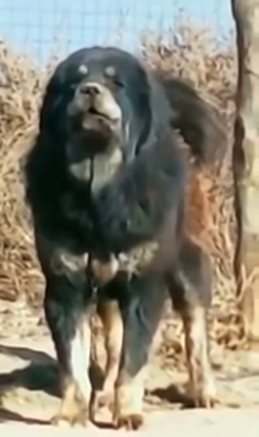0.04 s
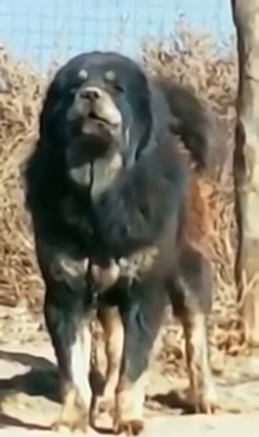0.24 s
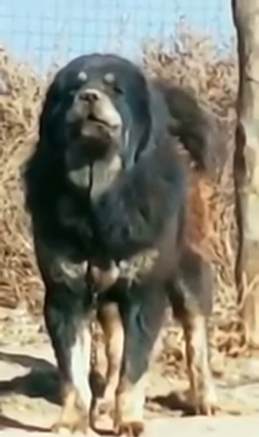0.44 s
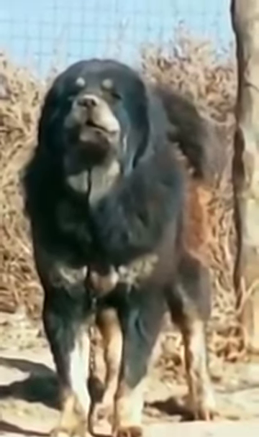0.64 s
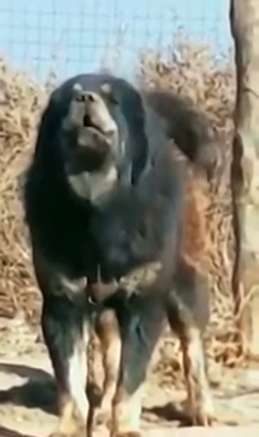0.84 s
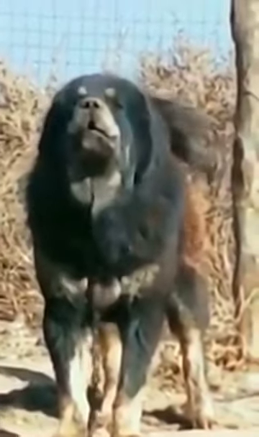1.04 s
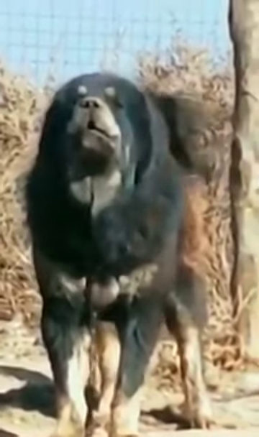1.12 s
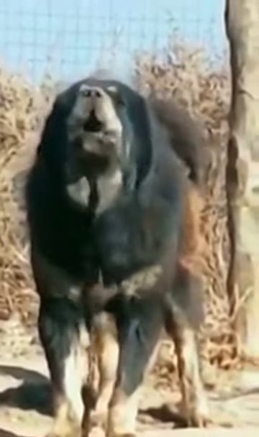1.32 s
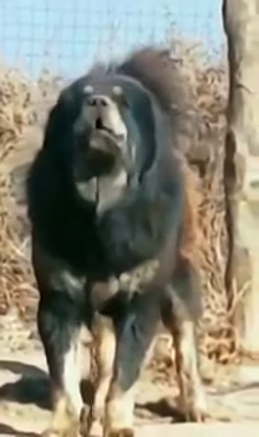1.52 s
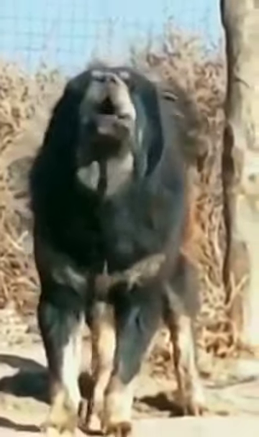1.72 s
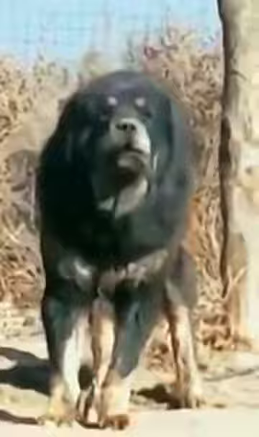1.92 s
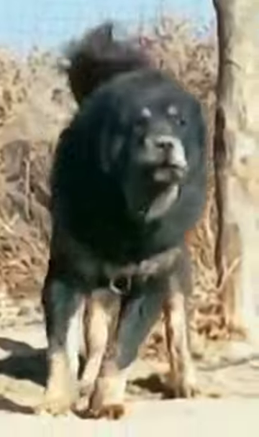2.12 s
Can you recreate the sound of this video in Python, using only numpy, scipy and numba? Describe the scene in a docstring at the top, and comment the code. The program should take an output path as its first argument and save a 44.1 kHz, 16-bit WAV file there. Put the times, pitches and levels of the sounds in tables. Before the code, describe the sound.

A large dog barks five times outdoors, deep and gruff, with one soft wuff.

```python
"""A big mastiff barks five times in a yard, with one soft closed-mouth wuff after the first bark.
Uneven puffs from its vocal folds and rasping air make its throat ring while the jaw opens and shuts;
the first and last barks are quieter, with a hollower ring and a faint far echo. A wall slaps each
bark back, dry brush scatters it and the yard adds a faint tail. Behind the dog are a low rumble,
a few dull bumps, a faint ringing and a thin far whistle."""
import sys
import numpy as np
from scipy import signal
from scipy.fft import rfft, irfft
from scipy.io import wavfile
from numba import njit

SR = 44100
rng = np.random.default_rng(int(sys.argv[2]) if len(sys.argv) > 2 else 0)


def store_pcm(level_fs):
    """Save levels as 16-bit WAV."""
    pcm = np.round(np.clip(level_fs, -1, 1) * 32767).astype(np.int16)
    wavfile.write(sys.argv[1], SR, np.atleast_2d(pcm).T)


N = 95388


def undb(db):
    """Turn decibels into a number to multiply by."""
    return 10 ** (np.asarray(db) / 20)


def unit(x):
    """Scale a sound to an average (rms) strength of 1."""
    return x / np.sqrt(np.mean(x ** 2) + 1e-20)


@njit
def bandpass(x, hz, width):
    """Keep the sound near a centre frequency that may move; the centre passes at full strength."""
    y, band_state, low_state = np.empty(len(x)), 0., 0.
    for i in range(len(x)):
        tuning, damping = np.tan(np.pi * hz[i] / SR), width / hz[i]
        band = (band_state + tuning * (x[i] + 1e-18 - low_state)) / (1 + tuning * (tuning + damping))
        band_state = 2 * band - band_state
        low_state += 2 * tuning * band
        y[i] = damping * band
    return y


def resonate(x, hz, width):
    """Make a sound ring near hz: two band-passes in a row give steep sides."""
    hz = np.minimum(hz * np.ones(len(x)), SR * .45)
    return bandpass(bandpass(x, hz, float(width)), hz, float(width))


def keep_side(x, side, hz, order=2):
    """Keep the "low" or "high" side of hz; a higher order cuts more sharply."""
    return signal.sosfilt(signal.butter(order, hz, side, fs=SR, output="sos"), x)


def wander(rate):
    """A random curve, roughly 1 in size, that turns about rate times a second."""
    return np.interp(np.arange(N) / SR * rate, np.arange(4096), rng.standard_normal(4096))


# How the outdoor noise is shared from bass to treble: f/Hz, relative level/dB
AIR_SPECTRUM = [(25, -17.5), (60, -5.5), (95, 1), (200, -5.5), (400, -6), (800, -22.5), (1200, -22.5),
                (1800, -37.5), (3000, -44.5), (9000, -44.5)]


def open_air():
    """Quiet open air over a low rumble, wavering a little in loudness."""
    hz, db = np.array(AIR_SPECTRUM).T
    freqs = np.maximum(np.fft.rfftfreq(N, 1 / SR), 1)
    gains = undb(np.interp(np.log(freqs), np.log(hz), db))
    level_db = -61 + 1.2 * wander(6)
    return undb(level_db) * unit(irfft(rfft(rng.standard_normal(N)) * gains, N))


# Narrow bands that ring in the air: f/Hz, width/Hz, relative level/dB
RINGING_BANDS = [(1316, 230, 1.5), (1787, 240, 3), (2243, 43, -10)]
# Their loudness together over time: t/s, level/dB
RINGING_LOUDNESS = [(0, -79), (.45, -75), (.8, -74.5), (1.05, -71.5), (1.45, -66.5), (1.8, -83), (2.1, -89)]


def ringing(t):
    """Faint narrow bands of noise hang in the air between the loud barks, then die away."""
    bands = sum(undb(db) * unit(resonate(rng.standard_normal(N), hz, width))
                for hz, width, db in RINGING_BANDS)
    times, level_db = np.array(RINGING_LOUDNESS).T
    return undb(np.interp(t, times, level_db)) * unit(bands)


# Points the whistle glides through: t/s, f/Hz, level/dB
WHISTLE_PATH = [(1.28, 1360, -67), (1.369, 1370, -59), (1.42, 1330, -76), (1.456, 1370, -65),
                (1.5, 1400, -88), (1.7, 1450, -74), (1.74, 1460, -66), (1.78, 1420, -63.5),
                (1.81, 1590, -66.5)]


def whistle(t):
    """A thin wavering note far away that swells, sinks and comes back."""
    times, hz, db = np.array(WHISTLE_PATH).T
    on_off = np.clip(np.minimum(t - times[0], times[-1] - t) / .0058, 0, 1)
    pitch = np.interp(t, times, hz) * (1 + .005 * wander(200))
    return on_off * undb(np.interp(t, times, db)) * np.sin(2 * np.pi * np.cumsum(pitch) / SR)


# Dull bumps and, near 1100 Hz, faint short far echoes of the first and last barks:
# t/s, level/dB, f/Hz, decay/s
BUMPS_AND_FAR_ECHOES = [(.11, -57, 1100, .022), (.395, -50, 230, .052), (.442, -47, 213, .07),
                        (.955, -61, 430, .08), (2.008, -51, 160, .035), (2.025, -57, 1090, .035),
                        (2.097, -45, 210, .029), (2.142, -47, 220, .04)]


def bumps_and_far_echoes(t):
    """Each bump or far echo is made as a burst of noise that starts sharply and dies quickly."""
    out = 0
    for start, db, hz, decay in BUMPS_AND_FAR_ECHOES:
        age = np.maximum(t - start, 0)
        loudness = undb(db) * np.minimum(age / .0014, 1) * np.exp(-age / decay)
        out += loudness * unit(resonate(rng.standard_normal(N), hz, width=hz * .68))
    return out


# The yard's tail, band by band: f/Hz, relative level/dB, time to fade by sixty decibels/s
TAIL_BANDS = [(200, -30, 1), (382, -15, 0.23), (750, -31, .5), (1330, -22, .8), (2600, -19, 0.39),
              (4860, -18.5, 0.96), (8160, -5.5, 0.15)]


def yard_tail(x, t):
    """The yard lets each bark linger as a faint wash of sound."""
    response = 0
    for hz, db, fade_s in TAIL_BANDS:
        decay = undb(-60 * t / fade_s) * np.minimum(t / .03, 1)
        band = resonate(rng.standard_normal(N), hz, width=hz * .97)
        response += undb(db) * band * decay / np.linalg.norm(decay)
    return signal.fftconvolve(x, response)[:N]


def brush(x, t, decay_s=.0031, level_db=-7):
    """Dry brush close by scatters the treble, adding a short smear to the sound."""
    scatter = rng.standard_normal(N) * np.exp(-t / decay_s)
    scatter = keep_side(scatter / np.linalg.norm(scatter), "high", hz=370)
    return x + undb(level_db) * signal.fftconvolve(x, scatter)[:N]


def wall_echo(x, t, delay_s):
    """A wall sends the bark back a moment later and a little duller."""
    return np.interp(t - delay_s, t, keep_side(x, "low", hz=6100), left=0)


def vocal_folds(pitch, rough, jitter=.14, shimmer_db=3):
    """Puffs that turn strong-weak and uneven when rough, and air that rasps once in each pair."""
    cycles = np.cumsum(pitch * np.exp(jitter * rough * wander(300))) / SR
    at = np.flatnonzero(np.diff(np.floor(cycles)))  # one puff per cycle
    strong_weak = 1 + np.minimum(1.3 * rough[at], 1) * (-1) ** np.arange(len(at))
    shimmer = undb(shimmer_db * rough[at] * rng.standard_normal(N)[at])
    puffs = np.zeros(N)
    puffs[at] = strong_weak * shimmer * np.sqrt(SR / pitch[at])
    rasp = np.exp(-(cycles / 2 % 1) / 1.1) * rng.standard_normal(N)
    return puffs, unit(rasp)


def flutter(rough, rate_hz=84, depth=.75, jitter=.35):
    """Loose throat tissue flaps unevenly and chops a rough voice into gruff bursts."""
    flaps = np.cumsum(rate_hz * np.exp(jitter * wander(rate_hz))) / SR
    return 1 + depth * rough * np.sin(2 * np.pi * flaps)


# Bands that the nose takes out of the voice: f/Hz, width/Hz
NOSE_NOTCHES = [(815, 356), (1500, 170), (3500, 300)]


def muzzle(x, top_hz, hollow):
    """Little sound leaves the muzzle below the pitch, and the nose cuts narrow dips into the voice."""
    x = keep_side(x, "high", hz=.64 * top_hz, order=6)
    hollow_dip = [(2200, 1300)] if hollow else []  # one more, wide dip
    for hz, width in NOSE_NOTCHES + hollow_dip:
        x = x - bandpass(x, np.full(N, float(hz)), float(width))
    return x


# Where the throat and mouth ring in the middle barks and the wuff:
# f/Hz, width/Hz, relative level/dB, share by which a shut jaw lowers f, lag behind the throat/s
RINGS_FULL_BARK = [(590, 240, 0, .27, 0), (950, 90, -29, .1, .01), (1140, 110, -8, .08, .006),
                   (1320, 110, -28, .1, .01), (1720, 160, -21, .08, .004), (1950, 170, -21, .14, .012),
                   (2290, 170, -26, .14, .026), (2680, 260, -32, .12, 0), (3100, 400, -46, 0, .025),
                   (4600, 1200, -41, 0, .022), (5800, 1700, -42, 0, .008), (7500, 1800, -49, 0, 0)]
# The same for the hollower first and last barks
RINGS_HOLLOW_BARK = [(620, 240, 2, .25, .003), (880, 170, -7, .1, .005), (1075, 140, .5, .07, 0),
                     (1300, 180, -20, .1, .008), (1780, 260, -20, .08, 0), (2560, 200, -35, .05, 0),
                     (3020, 400, -34, 0, .012), (4440, 600, -28, 0, .016), (6100, 1000, -40, 0, .012),
                     (8000, 1200, -55, 0, 0)]


def bark(t, start, attack, swell, fade, db, swell_db, top_hz, scoop, roughness,
         throat_db, mouth_db, hiss_db, hollow):
    """The voice slides to top_hz and gets rougher and brighter as the jaw opens, then sinks and fades."""
    rise = np.clip((t - start) / swell, 0, 1)
    fall = np.clip((t - start - swell) / fade, 0, 2)
    onset = np.sin(np.pi / 2 * np.clip((t - start) / attack, 0, 1)) ** 2
    force = onset * undb(-swell_db * (1.5 - rise) - 20 * fall ** 2)
    pitch = top_hz * (1 - scoop * np.cos(np.pi / 2 * rise) ** 2) * (1 - .16 * np.minimum(fall, 1))
    jaw_shut = np.interp(t - .004, [start, start + swell, start + swell + fade], [1, 0, .5])
    muffling = 1.18 if hollow else 1  # a hollow bark starts and ends more muffled
    rough = roughness * np.clip(2 * rise, .3, 1)
    puffs, rasp = vocal_folds(pitch, rough)
    puffs *= flutter(rough)

    def voice(hz):
        """Puffs rule the bass and rasping air the treble."""
        air = rough * hz / 290
        return (puffs + air * rasp) / np.hypot(1, air)

    boom = resonate(force * voice(pitch), pitch, width=230)
    out = keep_side(boom, "low", hz=1.3 * top_hz)
    rings = RINGS_HOLLOW_BARK if hollow else RINGS_FULL_BARK
    for k, (hz, width, ring_db, drop, lag) in enumerate(rings):
        if hz > 2800:
            open_db, shut_db = hiss_db, -10
        elif hz > 900:
            open_db, shut_db = mouth_db, -16
        else:
            open_db, shut_db = throat_db, -9
        push, shut = np.interp(t - lag, t, force), np.interp(t - lag, t, jaw_shut)
        ring = resonate(push * voice(hz), hz * (1 - drop * shut), width)
        gain = undb(ring_db + open_db + shut_db * muffling * shut)
        out -= (-1) ** k * gain * ring  # neighbouring rings take opposite signs
    chest = undb(-26) * resonate(force * rasp, hz=125, width=140)
    out = muzzle(out, top_hz, hollow) + chest
    return out * undb(db) * np.sqrt(np.sum(force ** 2) / np.sum(out ** 2))


# One call per row; the second is the wuff. Columns: t/s, attack/s, swell/s, fade/s, base level/dB,
# growth over the swell/dB, top pitch/Hz, scoop (share by which the pitch starts lower), roughness (0-1),
# throat/dB, mouth/dB, hiss/dB, echo delay/s, echo/dB, tail/dB, hollow (0 or 1)
DOG_CALLS = [ (-.03, .026, .08, .05, -30, -2, 308, -.13, .24, 2, -28, 1, .11, -27, -5, 1),
             (.206, .05, .075, .085, -31, 7, 268, .17, .26, -32, -19, -9, .09, -17, -1, 0),
             (.47, .055, .135, .07, -19.5, 7.5, 356, .26, .44, -5, .5, -.5, .058, -15, 0, 0),
             (1.072, .036, .122, .036, -17.3, 6.5, 406, .33, .5, -4, -2, 1, .059, -10, 7, 0),
             (1.468, .017, .112, .058, -19.8, 3.5, 402, .29, .48, -.5, -3, .5, .062, -13, -4, 0),
             (1.803, .03, .134, .04, -28.3, 0, 362, .11, .5, -3, 0, -3.5, .12, -28, -11, 1), ]


def mastiff(t):
    """The dog barks; each call has its own amount of wall echo and yard tail."""
    near, into_yard = 0, 0
    for *shape, echo_s, echo_db, tail_db, hollow in DOG_CALLS:
        call = bark(t, *shape, hollow)
        near += call + undb(echo_db) * wall_echo(call, t, echo_s)
        into_yard += undb(tail_db) * call
    return brush(near, t) + yard_tail(into_yard, t)


def scene():
    """The dog and the quiet sounds behind it, in one channel."""
    t = np.arange(N) / SR
    return (mastiff(t) + bumps_and_far_echoes(t) + whistle(t) + ringing(t) + open_air())[None]


def record(dry, top_hz=9300):
    """Cut away the highest treble with a steep filter."""
    return signal.sosfilt(signal.ellip(8, .2, 70, top_hz, fs=SR, output="sos"), dry)


dry = scene()
out = record(dry)
store_pcm(out)
```